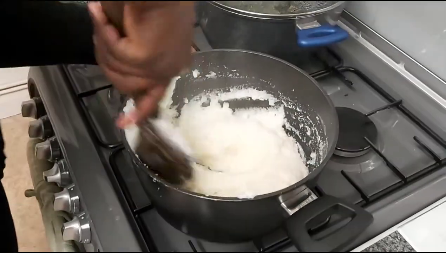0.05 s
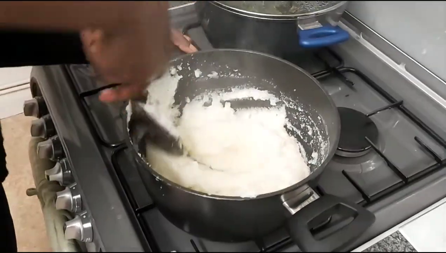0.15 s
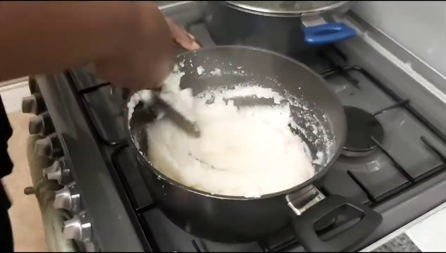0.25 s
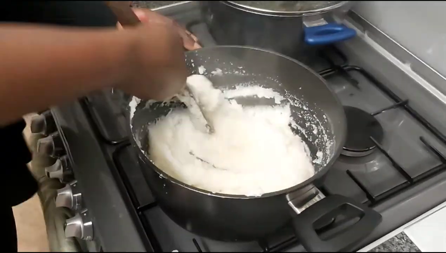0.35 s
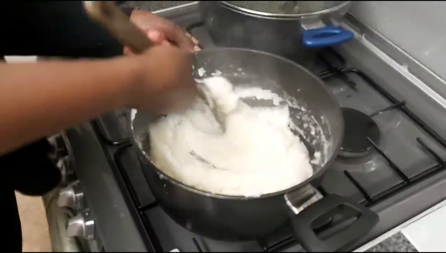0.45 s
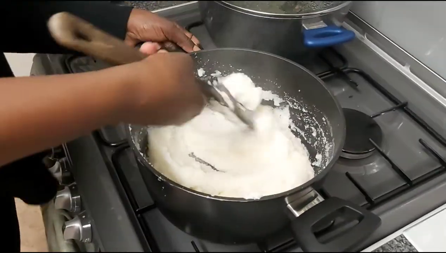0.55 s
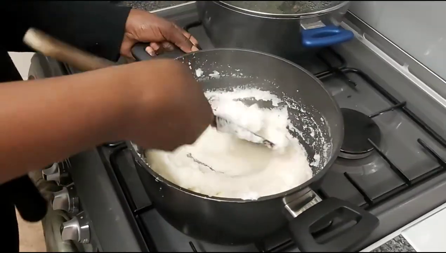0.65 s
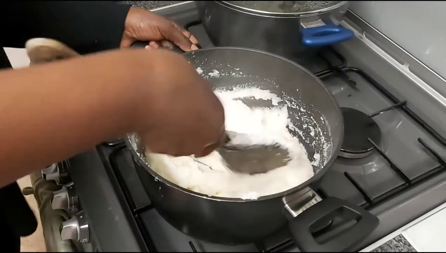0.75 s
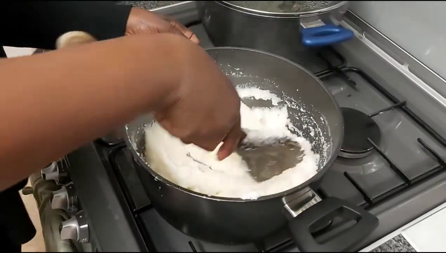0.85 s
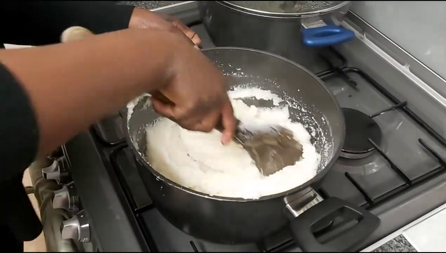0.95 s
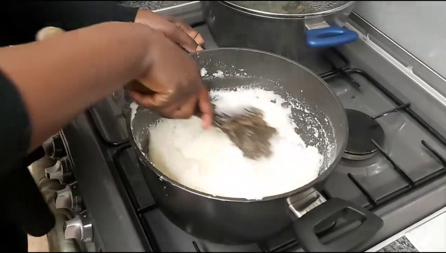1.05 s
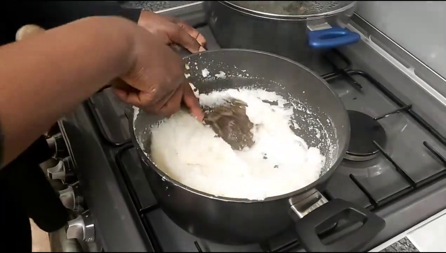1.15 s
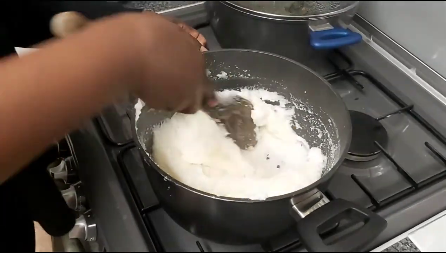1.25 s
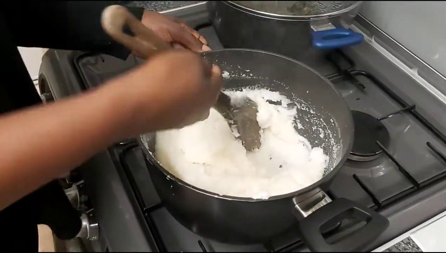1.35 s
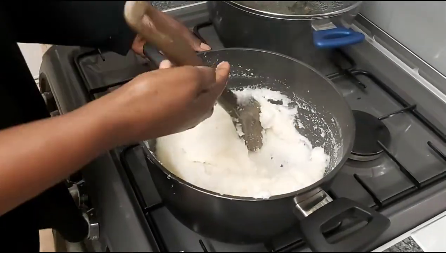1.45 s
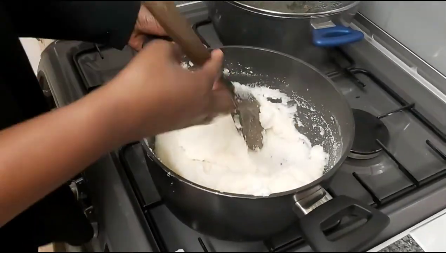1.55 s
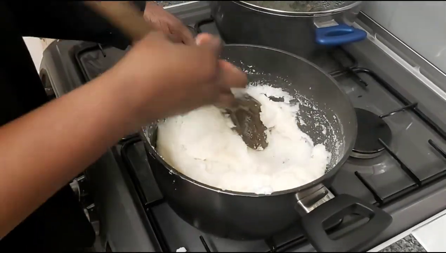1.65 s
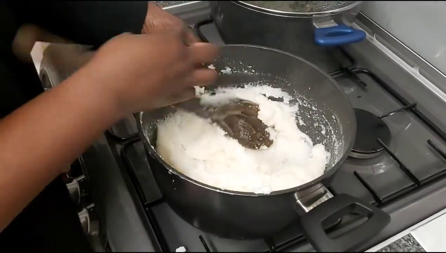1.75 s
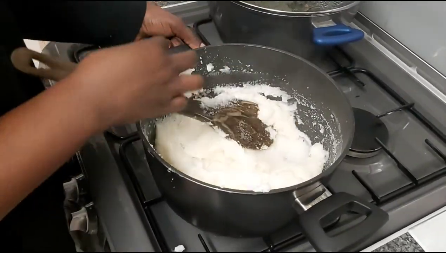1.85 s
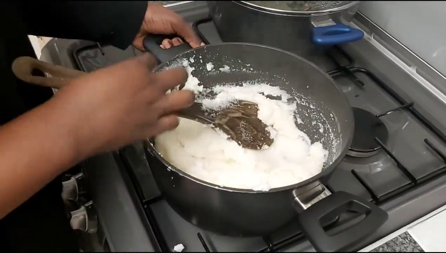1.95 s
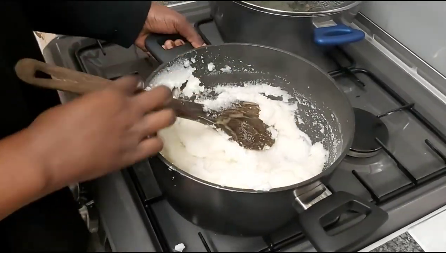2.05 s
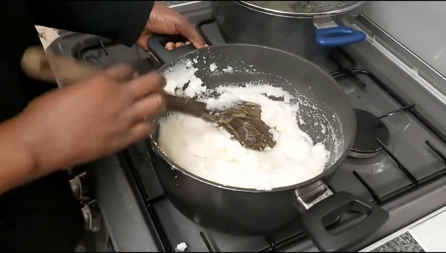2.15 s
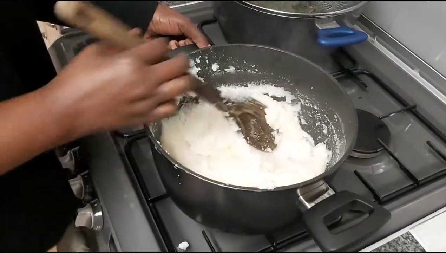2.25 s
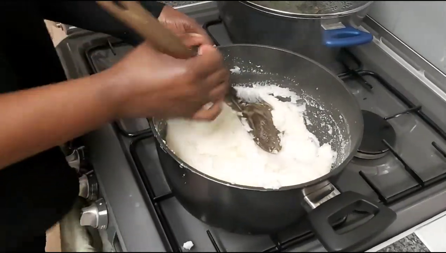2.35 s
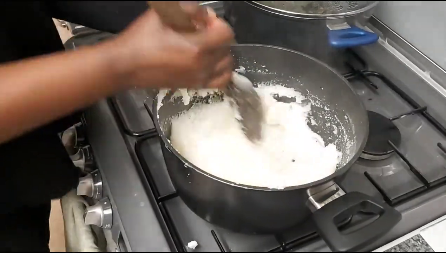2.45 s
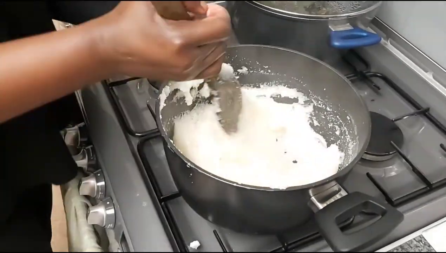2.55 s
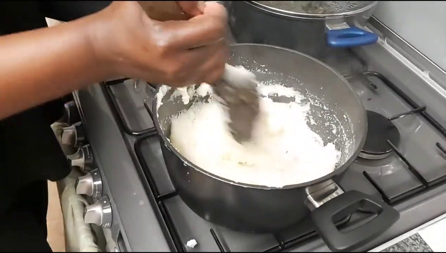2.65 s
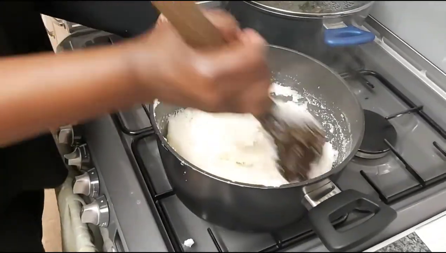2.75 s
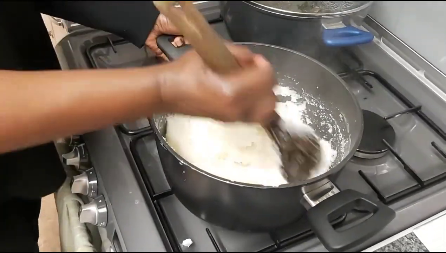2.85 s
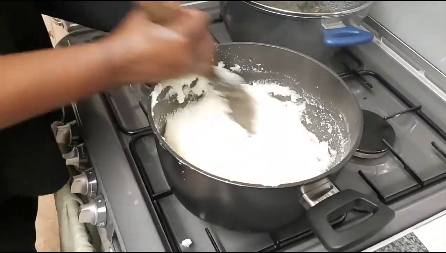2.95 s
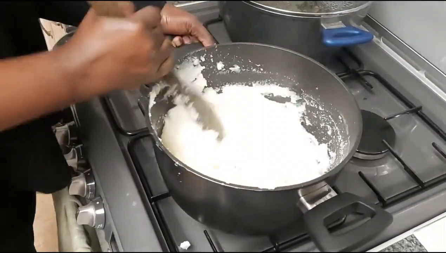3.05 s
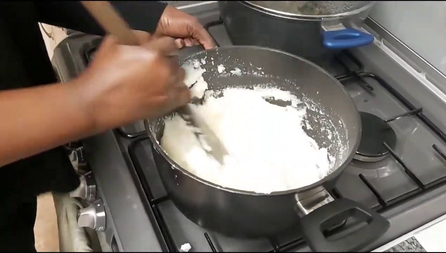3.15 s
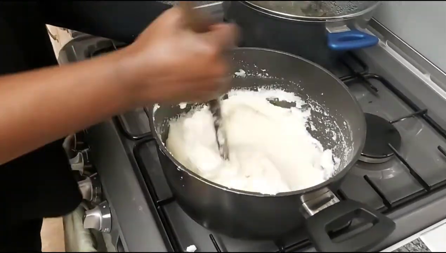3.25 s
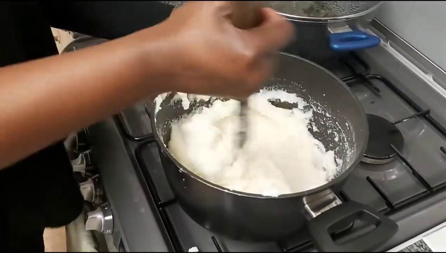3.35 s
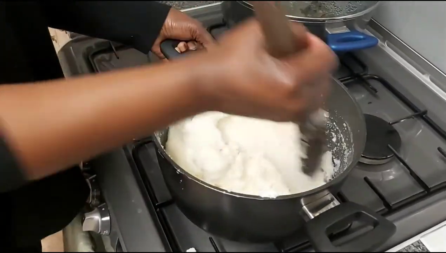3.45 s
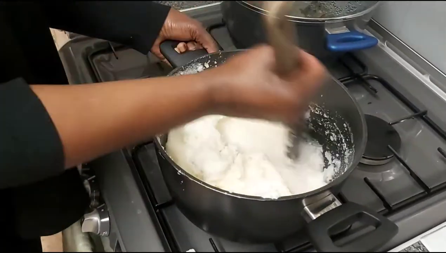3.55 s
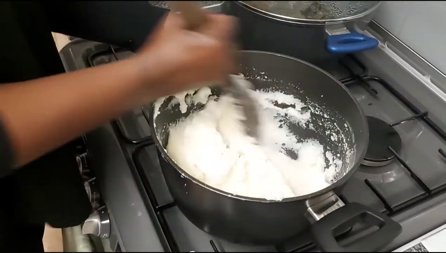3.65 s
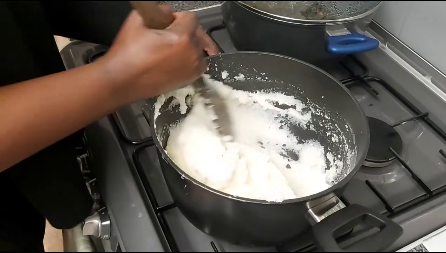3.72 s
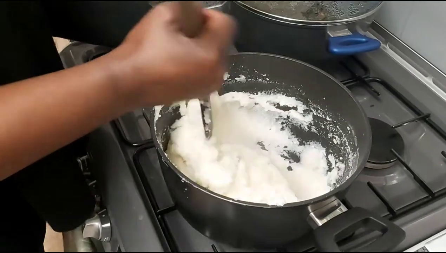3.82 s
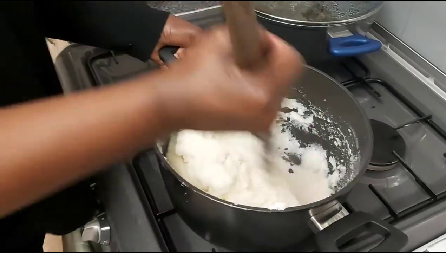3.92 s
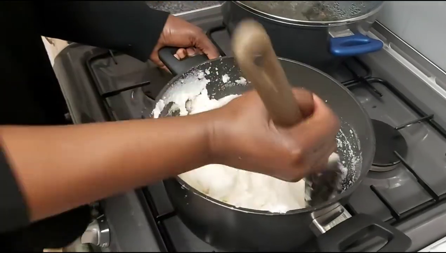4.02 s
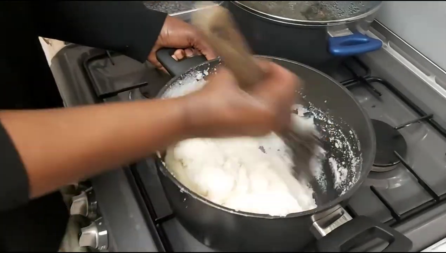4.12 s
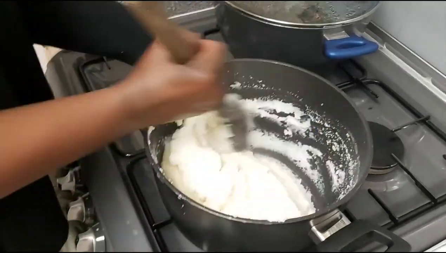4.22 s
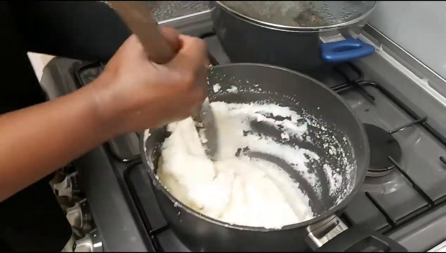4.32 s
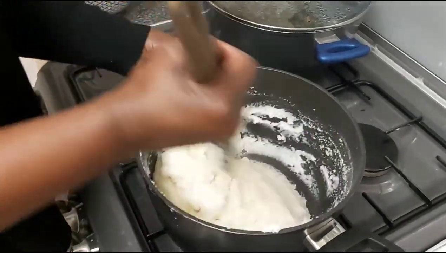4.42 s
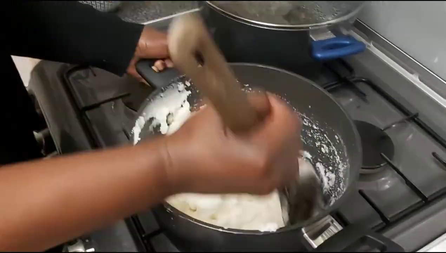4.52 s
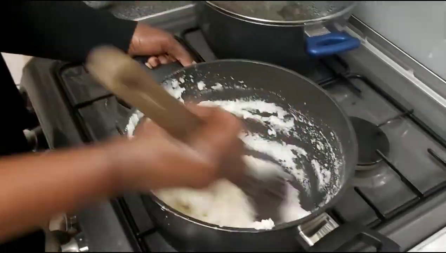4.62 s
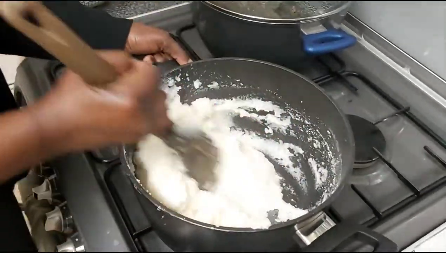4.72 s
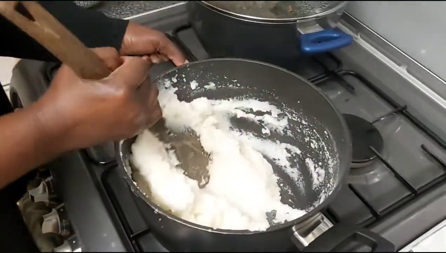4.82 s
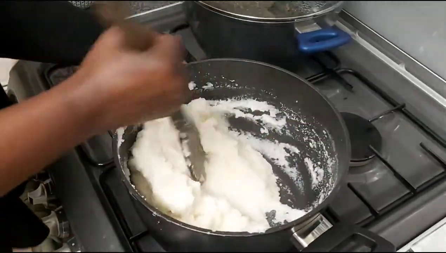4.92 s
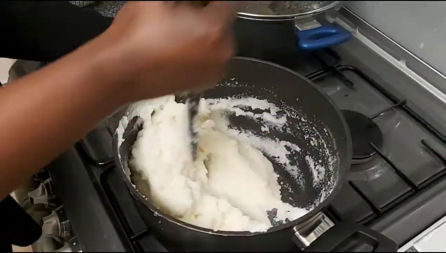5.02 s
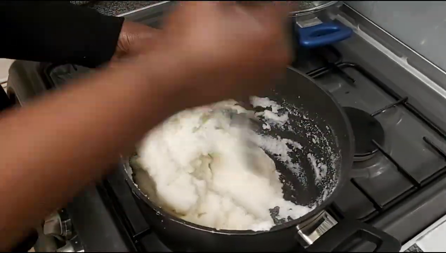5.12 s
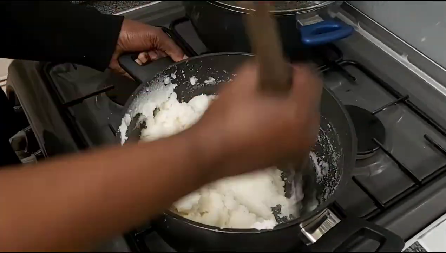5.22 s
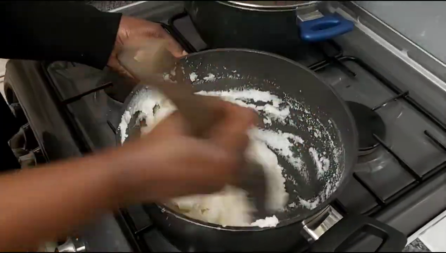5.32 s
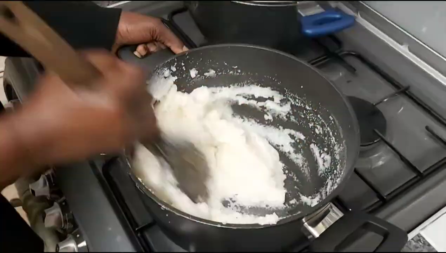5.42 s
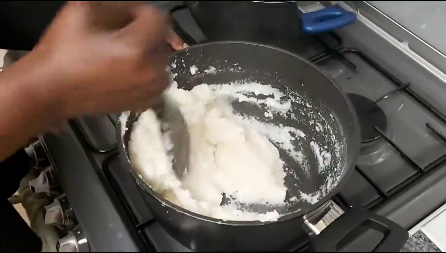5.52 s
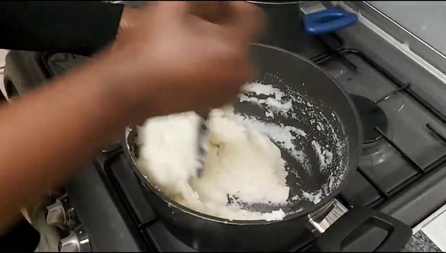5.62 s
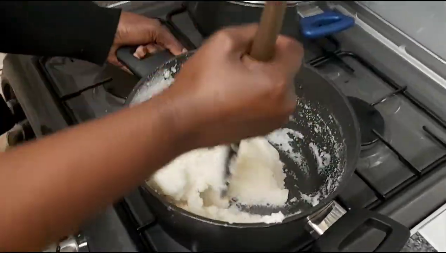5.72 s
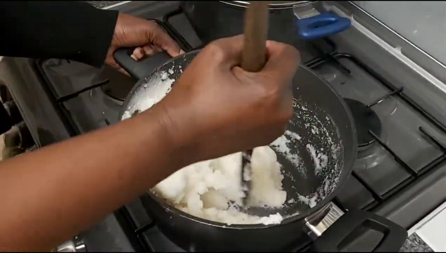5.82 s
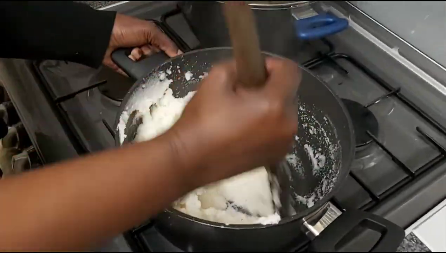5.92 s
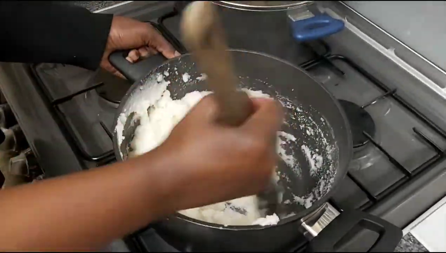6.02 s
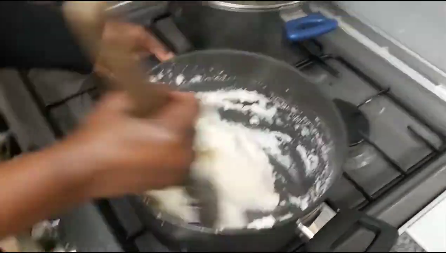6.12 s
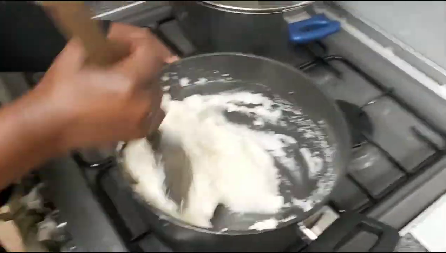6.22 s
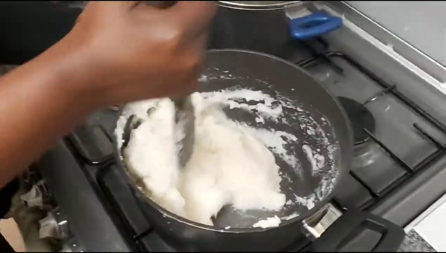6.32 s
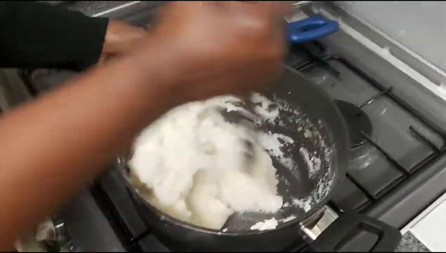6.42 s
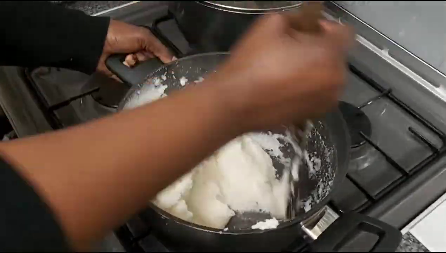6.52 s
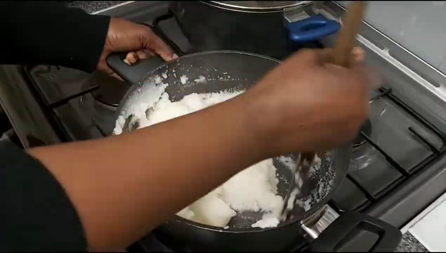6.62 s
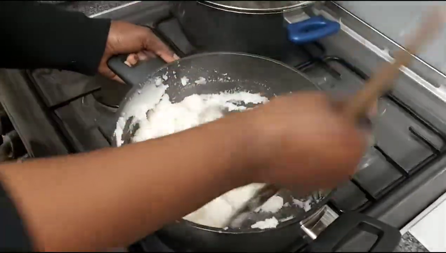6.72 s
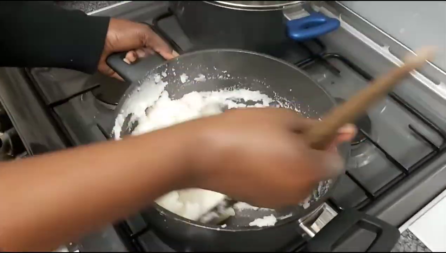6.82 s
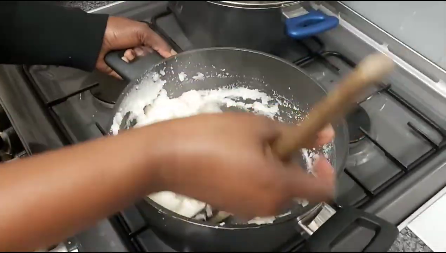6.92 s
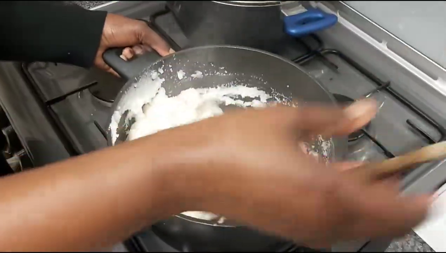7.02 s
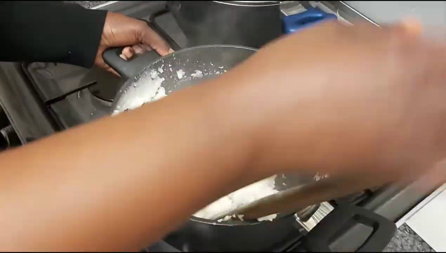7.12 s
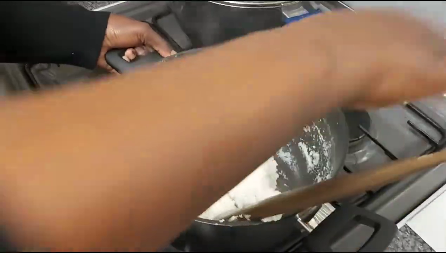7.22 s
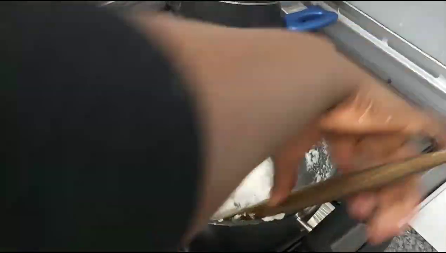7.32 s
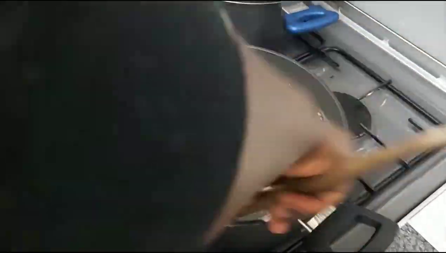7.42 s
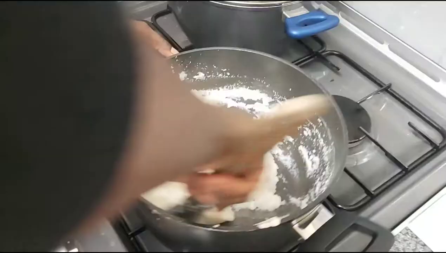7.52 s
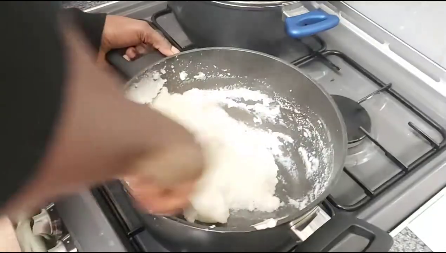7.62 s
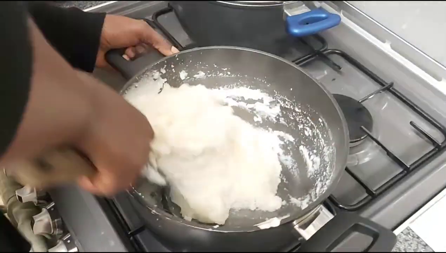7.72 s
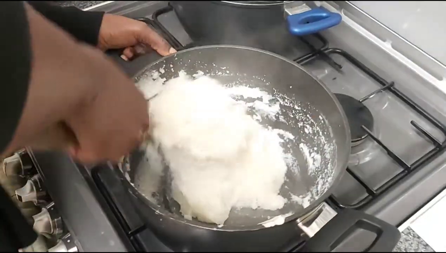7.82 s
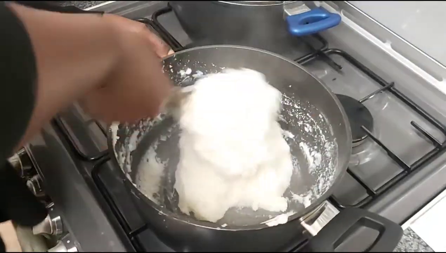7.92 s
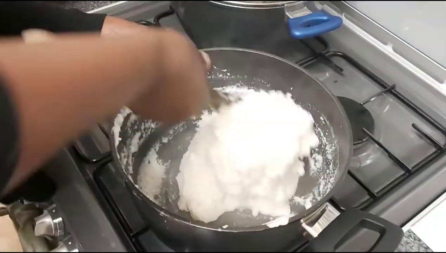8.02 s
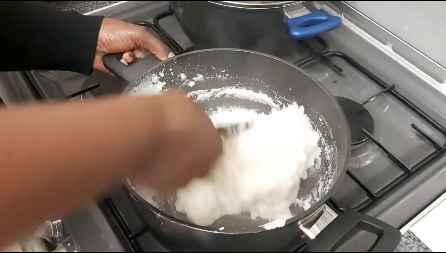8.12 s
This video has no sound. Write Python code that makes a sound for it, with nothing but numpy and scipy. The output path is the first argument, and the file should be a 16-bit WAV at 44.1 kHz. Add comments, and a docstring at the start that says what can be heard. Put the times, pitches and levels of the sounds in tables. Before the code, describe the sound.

Uneven knocks of a pot rocking on a stove grate mix with sticky stirring and short wooden scrapes, a gas flame hissing underneath.

```python
"""Small kitchen: stiff maize dough is stirred with a wooden spatula in a metal pot on a gas stove.
The burner roars softly and hisses throughout. The blade drags through sticky dough and scuffs
the pot wall; air pockets snap. Each hard stroke rocks the pot, which knocks on the iron grate,
rings and shakes the stove top."""
import sys
import numpy as np
from scipy import signal
from scipy.fft import rfft, irfft, next_fast_len
from scipy.io import wavfile
from scipy.ndimage import map_coordinates

SR = 44100
rng = np.random.default_rng(int(sys.argv[2]) if len(sys.argv) > 2 else 0)


def transcribe(signal):
    """Save signal, clipped to [-1, 1], as a 16-bit WAV file at the path in sys.argv[1]."""
    frames = np.atleast_2d(signal).T
    limited = np.clip(frames, -1, 1)
    pcm = np.round(limited * 32767).astype(np.int16)
    wavfile.write(sys.argv[1], SR, pcm)


N = 359856


def amp(db):
    """dB to gain."""
    return 10 ** (np.asarray(db) / 20)


def unit(x):
    """x at rms 1."""
    return x / np.sqrt(np.mean(x ** 2) + 1e-20)


def along(points, hz):
    """(f/Hz, value) points read on a log axis."""
    f, v = np.transpose(points)
    return np.interp(np.log(hz + 1), np.log(f + 1), v)


def wobble(rate_hz):
    """Smooth random curve, rate_hz knots a second."""
    knots = rng.standard_normal(int(N * rate_hz / SR) + 4)
    return map_coordinates(knots, [np.arange(N) * rate_hz / SR])


def swell(peak_s, rise_s, release_s, shape=2):
    """Gaussian rise, then a release: shape 1 is exponential, 2 Gaussian."""
    t = np.arange(N) / SR - peak_s
    return np.exp(-np.where(t < 0, (t / rise_s) ** 2, np.abs(t / release_s) ** shape).clip(0, 40))


def filtered(x, response):
    """x through response(f/Hz)."""
    n = x.shape[-1]
    m = next_fast_len(n + 4096)
    return irfft(rfft(x, m) * response(np.fft.rfftfreq(m, 1 / SR)), m)[..., :n]


def coloured(x, spectrum):
    """x shaped by (f/Hz, level/dB) points, at rms 1."""
    return unit(filtered(x, lambda hz: amp(along(spectrum, hz))))


def resonant(x, modes):
    """x through (f/Hz, width/Hz, level/dB) resonances, at rms 1."""
    def response(f):
        return sum(amp(db) * 1j * f * w / (hz * hz - f * f + 1j * f * w) for hz, w, db in modes)
    return unit(filtered(x, response))


def dying(x, t60s):
    """x decaying by (f/Hz, t60/s) points."""
    hz, t, z = signal.stft(x, SR, nperseg=256)
    decay = amp(-60 * t / along(t60s, hz)[:, None])
    return signal.istft(z * decay, SR, nperseg=256)[1][:, :x.shape[1]]


def spread(pair):
    """Two unrelated signals to left and right: alike in the bass, apart in the treble."""
    # left-right likeness: f/Hz, correlation
    alike = [(30, 0.29), (70, 0.91), (300, 0.88), (650, 0.49), (1400, 0.28), (3100, 0.23), (7000, 0.016)]
    turn = lambda hz: np.arccos(np.clip(along(alike, hz), -1, 1)) / 2
    mid, side = filtered(pair, lambda hz: np.array([np.cos(turn(hz)), np.sin(turn(hz))]))
    return np.array([mid + side, mid - side])


def noise(n):
    """Stereo white noise."""
    return spread(rng.standard_normal((2, n)))


def slips(n, rate_hz, scatter_db):
    """Tiny stick-slip releases of uneven size at random times."""
    sizes = (rng.random(n) < rate_hz / SR) * amp(scatter_db * rng.standard_normal(n).clip(-2, 2))
    return unit(spread(sizes * rng.standard_normal((2, n))))


def add(track, at_s, sound):
    """Mix sound into track."""
    start = int(np.clip(round(at_s * SR), 0, N - 1))
    track[:, start:start + sound.shape[1]] += sound[:, :N - start]


def kitchen(x, wet_db):
    """x plus its diffuse echo off the walls."""
    # room decay: f/Hz, t60/s
    room_t60 = [(100, 0.31), (350, 0.4), (1500, 0.44), (4000, 0.28), (12000, 0.05)]
    t = np.arange(SR // 2) / SR
    tail = dying(noise(len(t)), room_t60) * (1 - np.exp(-t / 0.00067))
    echo = signal.fftconvolve(x, tail / np.linalg.norm(tail[0]), axes=1)[:, :x.shape[1]]
    return x + amp(wet_db) * echo


def burner():
    """The flame roars; the gas jet flutters in each mixing-tube resonance and briefly whistles."""
    # level of the background hiss, which dips after the loud knock: t/s, level/dB
    hiss_level = [(0.0, -44), (0.2, -46.5), (0.62, -45), (1.1, -44), (1.45, -45), (1.85, -45), (2.08, -49.5),
                  (2.85, -47.5), (3.5, -44), (3.95, -46.5), (4.3, -47.5), (4.9, -43.5), (6.1, -44.5),
                  (7.35, -44.5), (8.16, -43)]
    # flame spectrum: f/Hz, level/dB
    roar_spectrum = [(25, -45), (65, -18), (100, -1.5), (140, -9.5), (330, -1), (580, -5.5), (800, -13),
                     (1500, -11), (2100, -14), (3100, -24), (5700, -24), (9000, -21.5), (14000, -30),
                     (16000, -29)]
    # tube resonances: f/Hz, width/Hz, level/dB
    tube_modes = [(1827, 54, 6.5), (1927, 135, -2.5), (2510, 130, -11.5), (4423, 240, -5), (6780, 160, -10),
                  (7920, 350, -16.5), (11570, 440, -17), (15300, 420, -23)]
    hiss_db = np.interp(np.arange(N) / SR, *np.transpose(hiss_level))
    roar = amp(2.5 + 1.2 * wobble(4.7)) * coloured(noise(N), roar_spectrum)
    jet = sum(amp(db + 1.2 * wobble(22)) * np.sqrt(width_hz) * resonant(noise(N), [(hz, width_hz, 0)])
              for hz, width_hz, db in tube_modes)
    whistle = swell(peak_s=5.86, rise_s=0.072, release_s=0.072) * resonant(noise(N), [(4390, 30, 0)])
    return amp(hiss_db) * (roar + amp(3.5) * unit(jet)) + amp(-44) * whistle


def dough():
    """Each stroke drags the mass: the stove rumbles, the pot wall murmurs, dough smears and peels."""
    # spatula strokes: peak t/s, rise/s, release/s, drag/dB, smear/dB, rumble/dB
    strokes = [(0.09, 0.057, 0.12, -31.5, -28.5, -52), (1.05, .1, 0.14, -42, -44, -44),
               (1.69, .1, .06, -50, -47, -71), (1.889, 0.061, 0.044, -35, -27, -28),
               (2.5, 0.11, 0.33, -43.5, -55, -54), (2.98, 0.12, 0.45, -37.5, -43.5, -56),
               (3.38, 0.22, 0.083, -37, -62, -38), (3.7, 0.047, 0.22, -38.5, -39, -65),
               (4.15, 0.052, 0.086, -32.5, -41.5, -32.5), (4.28, 0.071, 0.18, -48, -39, -35.5),
               (4.66, 0.061, 0.66, -57, -40.5, -57), (5.47, 0.14, 0.07, -32.5, -34, -37),
               (5.88, .1, 0.2, -58, -46, -65), (6.21, 0.15, .09, -39.5, -34.5, -40.5),
               (6.76, 0.18, 0.1, -40.5, -39.5, -43), (6.95, 0.2, 0.96, -44.5, -36.5, -63),
               (7.54, 0.067, 0.056, -32.5, -59, -37), (7.71, 0.051, 0.074, -27, -37, -32),
               (7.92, 0.12, .08, -29.5, -43, -43)]
    # pot wall resonances: f/Hz, width/Hz, level/dB
    wall_modes = [(370, 45, 11), (499, 11, 15), (600, 110, 6), (830, 160, -12.5), (995, 58, 4),
                  (1080, 63, -30), (1750, 130, -11), (2360, 180, -37)]
    # spectra of stove rumble, smearing and peeling: f/Hz, level/dB
    rumble_spectrum = [(25, -44), (50, -2), (70, -5), (100, 6), (140, -10), (220, -5.5), (400, -63)]
    smear_spectrum = [(300, -18), (1000, 12.5), (2300, 13.5), (3200, 5.5), (4400, 6.5), (6000, 2),
                      (9000, -34), (15000, -51)]
    peel_spectrum = [(1500, -30), (4000, -31), (7000, 5), (10000, 2.5), (12500, 6.5), (15500, 0)]
    peel_lag_s, peel_stretch = 0.023, 1.33
    drag_db, smear_db, rumble_db = np.transpose(strokes)[3:]
    peel_db = -44.5 + 0.22 * smear_db
    pushes = np.array([swell(s, rise_s, release_s, shape=0.77) for s, rise_s, release_s, *_ in strokes])
    pulls = np.array([swell(s + peel_lag_s, peel_stretch * rise_s, peel_stretch * release_s)
                      for s, rise_s, release_s, *_ in strokes])
    power_sum = lambda db, shapes: np.sqrt(amp(db) ** 2 @ shapes ** 2)
    grip_db = 2.4 * wobble(28)  # the dough catches and gives
    rumble = power_sum(rumble_db, pushes) * coloured(noise(N), rumble_spectrum)
    drag = resonant(slips(N, rate_hz=1500, scatter_db=3.5), wall_modes)
    drag *= power_sum(drag_db, pushes) * amp(grip_db - 3)
    smear = coloured(slips(N, rate_hz=5000, scatter_db=3), smear_spectrum)
    smear *= power_sum(smear_db, pushes) * amp(grip_db - 3.5)
    peel_gain = power_sum(peel_db, pulls) * amp(1.6 * wobble(23))
    peel = peel_gain * coloured(slips(N, rate_hz=14000, scatter_db=5), peel_spectrum)
    return rumble + kitchen(drag + smear + peel, wet_db=-3)


def swishes():
    """Dough slides off the wood: a dense wet crackle that swells and fades."""
    # slides: centre t/s, level/dB, sigma/s
    slides = [(0.134, -37, 0.036), (0.24, -41, 0.026), (1.052, -40.5, 0.024), (2.636, -60, 0.042),
              (3.394, -50, 0.026), (3.622, -32, 0.012), (3.835, -42, 0.042), (4.27, -43.5, 0.069),
              (4.79, -41.5, 0.033), (5.486, -41.5, 0.022), (6.238, -39.5, 0.035), (6.812, -45.5, 0.081)]
    # crackle spectrum: f/Hz, level/dB
    spectrum = [(600, -25), (1500, -28), (2700, 11), (5000, 11), (8000, 3.5), (12000, 0), (15500, -4)]
    t = np.arange(N) / SR
    envelope = sum(amp(db) * np.exp(-0.5 * ((t - s) / sigma_s) ** 2) for s, db, sigma_s in slides)
    crackle = coloured(slips(N, rate_hz=2200, scatter_db=-3.5), spectrum)
    return kitchen(envelope * crackle, wet_db=-5.5)


def ticks():
    """Air pockets snap and small hard contacts tick."""
    # snaps: t/s, peak/dB, pitch/Hz
    snaps = [(0.028, -6, 2610), (0.378, -33, 9000), (1.834, -26, 8800), (1.851, -7.5, 4220),
             (2.887, -32, 3460), (2.911, -19, 5400), (3.908, -28, 11000), (4.307, -19.5, 10520),
             (6.379, -24.5, 9450), (7.276, -9.5, 2350)]
    # snap modes: ratio of f to pitch, ratio of width to pitch, level/dB
    modes = [(.57, 0.045, 9), (1, 0.14, 7.5), (1.3, .12, -7.5), (2.06, 0.033, -3)]
    decay_s = 0.0012
    track, t = np.zeros((2, N)), np.arange(SR // 20) / SR
    for s, peak_db, hz in snaps:
        burst = noise(len(t)) * np.exp(-t / decay_s)
        snap = resonant(burst, [(hz * ratio, hz * width, db) for ratio, width, db in modes])
        snap = resonant(snap, [(hz, 2.1 * hz, 0)])  # finite contact time dulls the far treble
        add(track, s, amp(peak_db - 0.5) * snap / np.abs(snap).max())
    return kitchen(track, wet_db=-10)


def scuffs():
    """Wood skids on bare metal: a run of slips rubs, and squeaks in two bands an octave apart."""
    # skids: t/s, rub/dB, squeak/dB, squeak f/Hz
    skids = [(0.242, -28.5, -49, 4220), (1.283, -32, -38, 4060), (1.582, -33, -55, 4170),
             (1.688, -29, -43, 3770), (1.711, -28.5, -44, 4300), (2.501, -33.5, -36.5, 4020),
             (2.993, -31.5, -55, 4520), (3.322, -32.5, -56, 4550), (3.46, -25, -47, 4400),
             (3.66, -22.5, -25.5, 4140), (4.364, -25.5, -30, 4240), (4.764, -30.5, -37, 4200),
             (4.998, -29, -22.5, 4250), (5.037, -32, -26.5, 4220), (5.442, -34, -23, 4300),
             (6.415, -29, -44, 4000), (7.52, -35, -47, 4240), (7.963, -14.5, -18.5, 3740),
             (8.151, -23.5, -29, 3700)]
    # rub spectrum: f/Hz, level/dB
    rub_spectrum = [(80, -10.5), (350, 13), (700, 1), (1200, -0.5), (2200, 4), (2900, -10), (3800, -6),
                    (5200, -8.5), (14000, -27)]
    track, t = np.zeros((2, N)), np.arange(SR // 4) / SR
    press = lambda attack_s, decay_s: (1 - np.exp(-t / attack_s)) * np.exp(-(t / decay_s) ** 0.84)
    for s, rub_db, squeak_db, hz in skids:
        skid = slips(len(t), rate_hz=4000, scatter_db=2.5)
        rub = amp(rub_db) * press(0.0011, 0.018) * coloured(skid, rub_spectrum)
        width_hz = 200 + 4500 * amp(rub_db)  # harder push, coarser squeak
        bands = [(hz / 2, width_hz / 2, -1), (hz, width_hz, 0)]
        squeak = amp(squeak_db) * press(0.001, 0.0097) * resonant(resonant(skid, bands), bands)
        add(track, s, rub + squeak)
    return kitchen(track, wet_db=-8)


def pot_ring(t, bottom_hz, wall_hz):
    """Struck modes decay; the contact point favours those near bottom_hz and wall_hz."""
    # modes of pot, grate and stove top: f/Hz, level/dB, t60/s
    modes = [(71, -4.5, 0.22), (97.7, -1.5, 0.15), (129, 2, 0.1), (144, -18, 0.34), (185, -4, 0.13),
             (245, -16, 0.24), (289.4, -14, 0.068), (319.8, -6.5, 0.092), (398.7, -12, 0.089),
             (485, -9.5, 0.045), (509.5, -7, 0.047), (668.7, -15, 0.2), (774, -17, 0.043),
             (913.4, -11, 0.041), (1042, -18.5, 0.096), (1169, -11, 0.071), (1193.5, -11, 0.047),
             (1636, -15, 0.11), (1894, -9, 0.074), (2170, -17, 0.11), (3650, -39, .08), (4070, -24, 0.082),
             (4250, -10, 0.061)]
    hz, db, t60_s = np.transpose(modes)[:, :, None]
    detune, scatter, skew = rng.standard_normal((3, len(modes), 1))
    loaded_hz = hz * (1 + 0.012 * detune)  # the dough loads the pot differently each time
    near = lambda centre_hz: np.exp(-(np.log(hz / centre_hz) / 0.15) ** 2)
    accent_db = 8 * near(bottom_hz) + 14 * near(wall_hz)
    swing = amp(db + accent_db + 0.37 * scatter - 60 * t / t60_s)
    swing *= rng.choice([-1, 1], hz.shape)
    skew_rad = skew * np.minimum(hz / 2200, 1)  # short waves arrive out of step left and right
    phase = 2 * np.pi * loaded_hz * t
    return unit(np.array([np.sum(swing * np.sin(phase + side * skew_rad), axis=0) for side in (1, -1)]))


def knock(bottom_hz, wall_hz, onset_s):
    """One blow: the pot lands and rings; a dull early echo follows close behind."""
    # dense upper modes: f/Hz, level/dB
    clatter_spectrum = [(60, -23), (300, -14.5), (1200, -4.5), (2500, -6.5), (4500, -21), (7000, -24.5),
                        (15000, -55)]
    # their decay: f/Hz, t60/s
    clatter_t60 = [(100, 0.69), (1000, 0.069), (4000, 0.034), (12000, 0.33)]
    echo_s, echo_cutoff_hz = 0.0088, 700
    t = np.arange(SR * 2 // 3) / SR
    ring = pot_ring(t, bottom_hz, wall_hz)
    clatter = unit(dying(coloured(noise(len(t)), clatter_spectrum), clatter_t60))
    impact = np.exp(-t / 0.0051) * coloured(noise(len(t)), clatter_spectrum)
    blow = ring + amp(-9.5) * clatter + amp(6) * impact
    settle = filtered(blow, lambda f: np.exp(-2j * np.pi * f * echo_s) / (1 + 1j * f / echo_cutoff_hz))
    seated = amp(-6 / (1 + np.exp(-np.minimum(t - 0.022, 0.1) / 0.001)))  # the grate damps the pot
    landing = 1 - np.exp(-t / onset_s)
    return kitchen((blow + 0.23 * settle) * seated * landing, wet_db=-7.5)


def knocks():
    """Hard strokes rock the pot on the grate; harder contact brings out the upper registers."""
    # blows: t/s, pot bottom f/Hz, pot wall f/Hz, strength/dB, hardness/dB, stove thud/dB
    blows = [(0.028, 460, 1010, -19, 10.5, -48), (0.868, 400, 890, -34.5, -4, -39.5),
             (1.8469, 378, 1076, -15, 4, -26), (2.429, 330, 905, -37, -11, -42.5),
             (2.912, 470, 910, -39, 5, -30.5), (2.922, 420, 775, -25, -11, -38),
             (3.2033, 275, 1120, -13, -21.5, -19), (3.5759, 306, 1090, -11.5, 1, -34),
             (3.6465, 374, 970, -16.5, -0.5, -22), (4.084, 570, 1270, -15, 8.5, -31.5),
             (4.2467, 384, 950, -19.5, -2, -38), (4.888, 310, 990, -18, -28, -24),
             (5.31, 463, 820, -18.5, -2.5, -23.5), (5.336, 330, 760, -21, 0, -17),
             (6.037, 500, 1070, -23, 13, -31), (6.679, 368, 900, -45, -3, -33),
             (6.788, 397, 1134, -37, 11.5, -40.5), (7.056, 360, 900, -24, -20, -27.5),
             (7.084, 305, 847, -13.5, 3.5, -20.5)]
    # contact bands: low f/Hz, high f/Hz
    contact_bands = [(680, 1480), (1520, 3100), (3200, 15000)]
    # body band, then contact bands: level re strength/dB, share of hardness
    registers = [(1.5, 0.053), (-4.5, 0.53), (-14, 0.81), (-25.5, 0.18)]
    thud_low_hz, body_top_hz, firm_db = 57.6, 608, -28
    track = np.zeros((2, N))
    for s, bottom_hz, wall_hz, db, hardness_db, thud_db in blows:
        onset_s = 1 / SR - 2.96 * max(firm_db - db, 0)  # negative if weak: a near-linear fade-in
        blow = knock(bottom_hz, wall_hz, onset_s)
        split_hz = min(0.78 * bottom_hz, body_top_hz / 2)
        bands = [(thud_low_hz, split_hz), (split_hz, body_top_hz)] + contact_bands
        levels_db = [thud_db] + [db + offset_db + share * hardness_db for offset_db, share in registers]
        for band_hz, level_db in zip(bands, levels_db):
            part = signal.sosfilt(signal.butter(3, band_hz, "bandpass", fs=SR, output="sos"), blow)
            add(track, s, amp(level_db) * part / np.std(part[:, :SR // 40]))  # level of the first 25 ms
    return track


def scene():
    """All sources, a little to the right in most bands."""
    # stereo balance: f/Hz, left minus right/dB
    balance = [(60, 4.5), (130, -6.5), (350, -2.5), (700, -3), (2200, -3), (4400, -2.5), (8000, 5.5),
               (13000, -2.5)]
    mix = knocks() + scuffs() + ticks() + swishes() + dough() + burner()
    return filtered(mix, lambda hz: amp(np.outer([0.5, -0.5], along(balance, hz))))


def record(dry):
    """Soft clip, then band limit."""
    rounded = dry / (1 + np.abs(dry) ** 6) ** (1 / 6)
    return filtered(rounded, lambda hz: hz < 15950)


dry = scene()
out = record(dry)
transcribe(out)
```